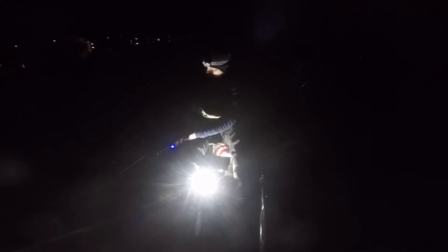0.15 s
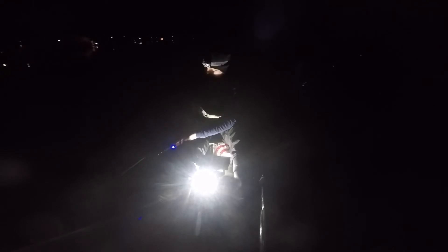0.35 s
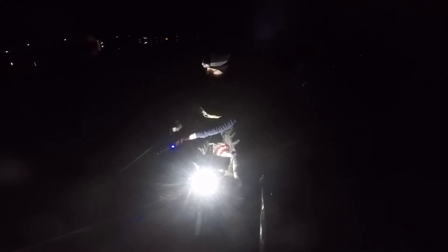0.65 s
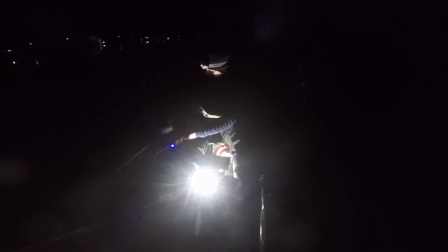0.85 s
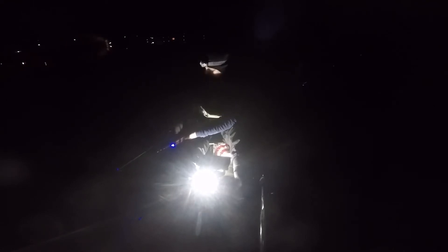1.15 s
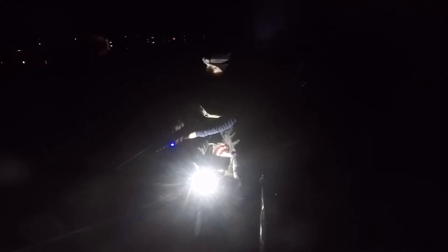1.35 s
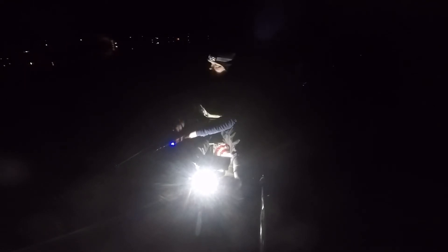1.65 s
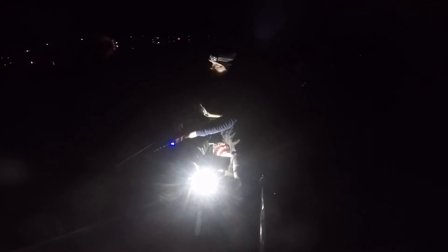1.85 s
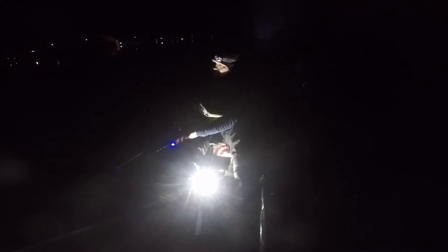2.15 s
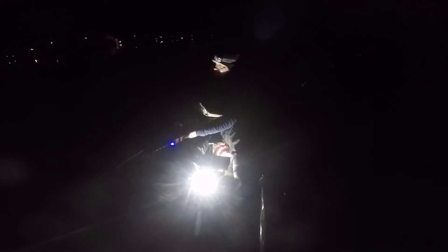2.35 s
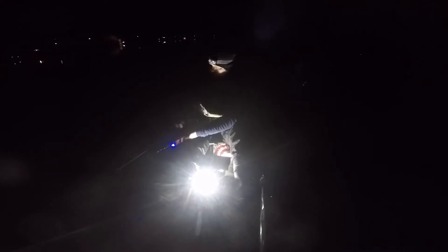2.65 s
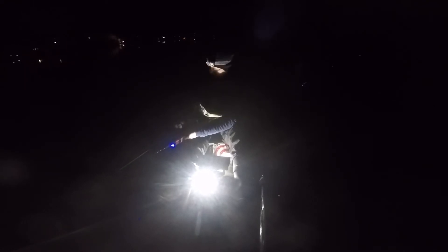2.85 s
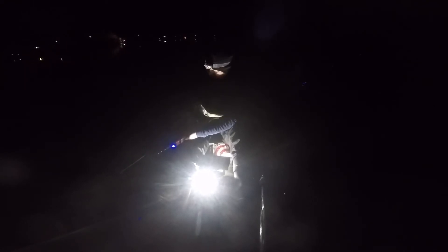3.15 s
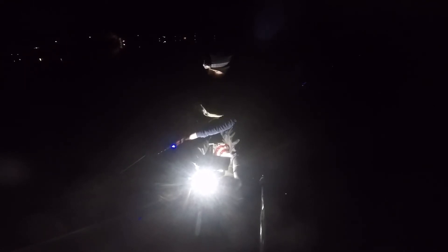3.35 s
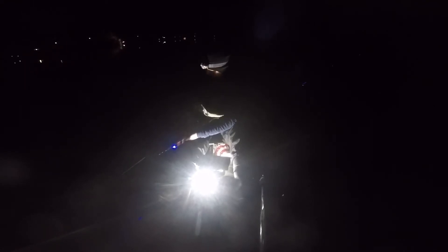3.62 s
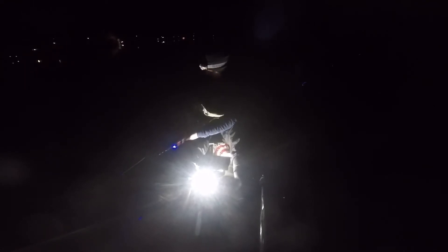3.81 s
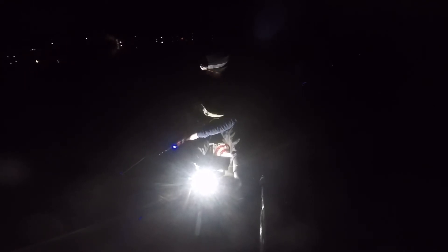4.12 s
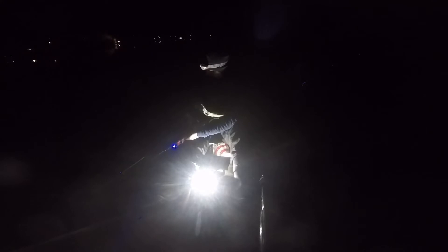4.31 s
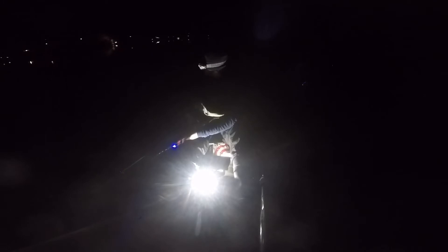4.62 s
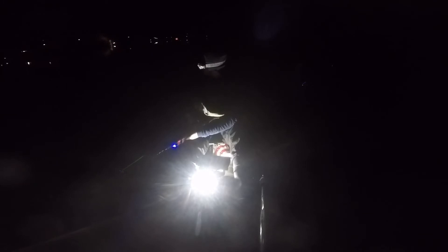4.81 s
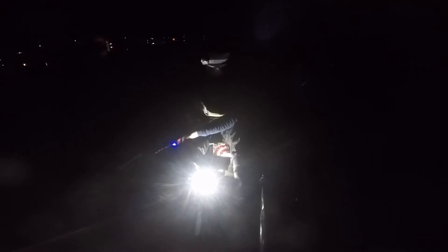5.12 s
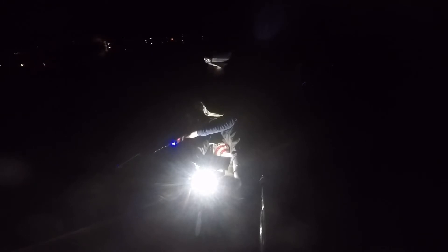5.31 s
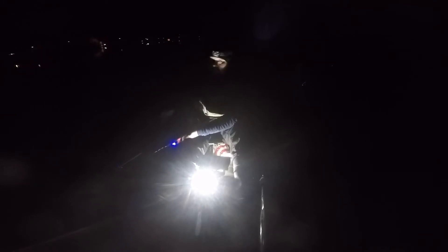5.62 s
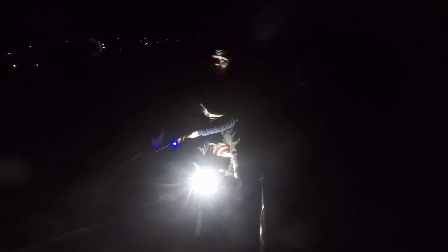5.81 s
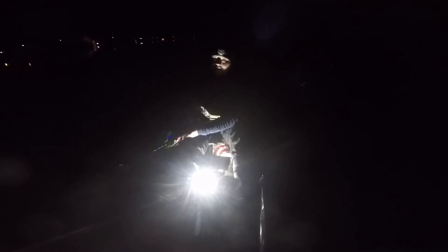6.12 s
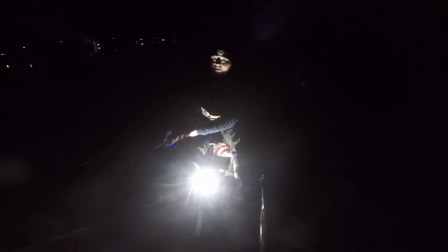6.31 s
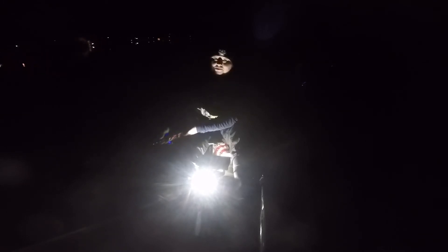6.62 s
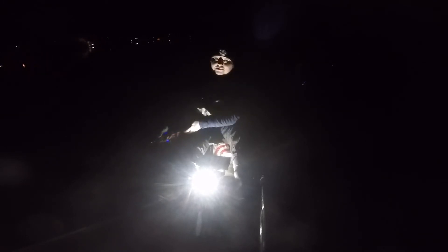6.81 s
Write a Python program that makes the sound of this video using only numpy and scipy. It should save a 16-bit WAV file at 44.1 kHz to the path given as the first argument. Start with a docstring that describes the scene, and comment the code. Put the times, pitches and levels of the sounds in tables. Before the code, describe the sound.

Low, fluttering motor drone across dark water, rising slightly before sliding away near five seconds, leaving rough rumble, soft water wash and hiss.

```python
"""A river at night: a distant motor hums and throbs, slowly gains speed, then winds down to a low idle.
The hum is a phase-integrated tone with weak partials; its rumble and the river's wash are coloured noise.
Weaker tones swell out of the rumble; a puff of wind dies away at the start, and a small gust follows.
Near the end come tiny ticks, a faint chirp and a soft double knock.
Electronics add hiss, a thin whine and a faint high buzz in regular bursts, mostly on the right."""
import sys
import numpy as np
from scipy import signal
from scipy.fft import rfft, irfft
from scipy.io import wavfile
from scipy.ndimage import uniform_filter1d

SR = 44100
rng = np.random.default_rng(int(sys.argv[2]) if len(sys.argv) > 2 else 0)


def transcribe(signal):
    """Save signal, clipped to [-1, 1], as a 16-bit WAV file at the path in sys.argv[1]."""
    frames = np.atleast_2d(signal).T
    limited = np.clip(frames, -1, 1)
    pcm = np.round(limited * 32767).astype(np.int16)
    wavfile.write(sys.argv[1], SR, pcm)


N = 307068
TIME = np.arange(N) / SR  # s
BINS_HZ = np.maximum(np.arange(N // 2 + 1) * SR / N, 1)

# How far sound reaches two microphone ports:
# (frequency [Hz], left minus right [dB], phase lead of left [rad], coherence [0-1])
PORT_RESPONSE = [(130, -1, -.18, .995), (220, -1.4, -.24, .975), (330, -3.2, -.42, .91),
                 (450, -6.8, -.68, .9), (540, -10, -1.0, .8), (620, -11.3, -1.9, .45),
                 (760, -7.7, -3.3, .72), (1000, -4.8, -3.8, .85), (1550, -4.4, -4.2, .78),
                 (1900, -4.5, -5.3, .68), (2350, -2.2, -5.4, .15), (2600, -2.2, -4.6, .55),
                 (3200, -3.3, -5.9, .82), (4200, -3.8, -6.8, .8), (5200, -1, -6.8, .15)]


def from_db(db):
    """Logarithmic level: 20 dB is a factor of ten in amplitude."""
    return 10 ** (np.asarray(db) / 20)


def in_time(rows):
    """Linear interpolation: each column of a curve at every sample."""
    s, *columns = np.transpose(rows)
    return [np.interp(TIME, s, column) for column in columns]


def over_hz(rows):
    """Logarithmic frequency scale: each column of a table at every frequency bin."""
    hz, *columns = np.transpose(rows)
    return [np.interp(np.log(BINS_HZ), np.log(hz), column) for column in columns]


def colour(spectrum):
    """Spectral shaping: gain per bin, falling 36 dB per octave beyond the end values."""
    lowest_hz, highest_hz = spectrum[0][0], spectrum[-1][0]
    inside = np.minimum(1, np.minimum(BINS_HZ / lowest_hz, highest_hz / BINS_HZ))
    return from_db(over_hz(spectrum)[0]) * inside ** 6


def drift(rate_hz):
    """Low-passed noise: a random fluctuation of unit spread, its spectrum halved at rate_hz."""
    slow = irfft(rfft(rng.standard_normal(N)) / (1 + (BINS_HZ / rate_hz) ** 2), N)
    return slow / slow.std()


def far_noise(spectrum):
    """Partial coherence: coloured noise shared by two ports; the mean of the ports has unit rms."""
    balance_db, lead, coherence = over_hz(PORT_RESPONSE)
    balance = from_db(balance_db)
    coherence = np.clip(coherence, 0, .999)
    right, independent = rfft(rng.standard_normal((2, N)))
    left = coherence * right + np.sqrt(1 - coherence ** 2) * independent
    left = left * balance * np.exp(1j * lead)
    # dividing by the expected size of the sum leaves the spectrum as that of the middle
    middle = np.sqrt(1 + balance ** 2 + 2 * coherence * balance * np.cos(lead))
    pair = irfft(np.array([left, right]) * colour(spectrum) / middle, N)
    return pair / pair.mean(axis=0).std()


def at_ports(sound):
    """Interaural-like differences: a far tone reaches two ports with unequal level and phase."""
    balance_db, lead, _ = over_hz(PORT_RESPONSE)
    left = from_db(balance_db) * np.exp(1j * lead)
    gains = np.array([left, np.ones_like(left)]) * 2 / (1 + abs(left))
    return irfft(rfft(sound) * gains, N)


def steadied(noise, share):
    """Envelope compression: part of the noise's slow surges in power is evened out."""
    span_s = .12
    power = uniform_filter1d(np.mean(noise ** 2, axis=0), max(int(span_s * SR), 1))
    return noise * (power / power.mean()) ** (-np.clip(share, 0, 1) / 2)


def motor_hum(pitch, gain_db, partials_db, waver_hz, flutter_db):
    """Phase is integrated frequency: a throbbing tone and weak partials follow the motor's speed."""
    # Hum over the water: (time [s], level before gain_db, flutter and throb [dB])
    hum_level = [(0, -28), (.2, -32.5), (.45, -27), (.75, -28.5), (1.0, -28), (1.45, -25.5), (1.67, -27),
                 (1.9, -25), (2.17, -30), (2.37, -24), (2.54, -32.5), (2.73, -24), (3.1, -25.5),
                 (3.4, -27.5), (3.63, -25), (3.85, -25), (4.2, -25.5), (4.4, -29), (4.8, -31), (5.15, -31),
                 (5.4, -35), (5.65, -39), (5.9, -42.5), (6.96, -47)]
    # Partials in step with the hum: (multiple of its pitch, relative level before partials_db [dB])
    partials = [(7 / 8, -23), (13 / 8, -21), (2, -26), (3, -26)]
    # Higher tone of the same motor, at 11/8 of the hum's pitch, free of throb: (time [s], level [dB])
    upper_level = [(0, -46), (.6, -45.5), (2, -45), (3.1, -39.5), (3.35, -47), (5.2, -45), (5.6, -58)]
    upper_ratio = 11 / 8

    phase = 2 * np.pi * np.cumsum(pitch + waver_hz * drift(10.4)) / SR
    tone = np.sin(phase)
    for multiple, db in partials:
        tone = tone + from_db(db + partials_db + 2.1 * drift(4.1)) * np.sin(multiple * phase)
    level_db = in_time(hum_level)[0] + gain_db + flutter_db * drift(21.3)
    hum = tone * throb(deepen=0.93, soften=0.99) * from_db(level_db)
    upper = from_db(in_time(upper_level)[0]) * np.sin(upper_ratio * phase)
    return np.sqrt(2) * at_ports(hum + upper)  # peak to rms


def throb(deepen, soften):
    """Amplitude modulation: brief Gaussian dips, uneven in spacing and depth."""
    # Dips: (centre [s], width before soften [s], depth before deepen [dB])
    dips = [(.195, .07, 2), (0.484, 0.033, 4.5), (0.729, 0.053, 5), (0.82, 0.022, 9.5), (1, 0.043, 10),
            (1.242, 0.038, 5), (1.687, 0.04, 8), (1.794, 0.036, 7), (2.216, 0.042, 11), (2.34, 0.058, 8.5),
            (2.467, 0.028, 3), (2.576, .05, 6), (2.8, 0.047, 10), (2.898, 0.025, 7), (3.01, 0.043, 8),
            (3.11, 0.028, 7), (3.22, 0.032, 7), (3.308, 0.039, 9), (3.38, 0.061, 6), (3.506, 0.046, 13),
            (3.79, .055, 6), (3.899, 0.035, 9), (4.013, 0.11, 7), (4.166, 0.032, 7), (4.293, 0.086, 5),
            (4.374, 0.03, 14), (4.573, .035, 9), (4.668, 0.042, 11), (4.765, 0.035, 7), (4.91, 0.13, 16),
            (5.025, .035, 10), (5.094, .035, 8), (5.266, 0.06, 12)]
    depth_db = sum(db * np.exp(-(2 * (TIME - s) / (soften * width)) ** 2) for s, width, db in dips)
    return from_db(-deepen * depth_db)


def motor_body(pitch, low_level, middle_level, even_share, ripple_db):
    """Band-shaped noise: the motor's rough rumble, its deepest band thinning as the pitch climbs."""
    # Spectra of the deepest, low and middle bands: (frequency [Hz], relative density [dB per Hz])
    deep_spectrum = [(113, -41), (121, -24), (127, -4.5), (136, 4.5), (146, 5), (162, -24)]
    low_spectrum = [(132, -31), (143, -11), (155, 2.5), (175, 0.5), (195, -1), (220, 0), (240, -3),
                    (260, -1.5), (290, -6.5), (340, -18.5), (420, -20)]
    middle_spectrum = [(270, -16.5), (330, -5.5), (365, -0.5), (420, -2), (480, 0), (520, 1), (560, -4.5),
                       (605, -8), (645, -14), (720, -16.5), (900, -30.5)]
    deep_db, thinning_db_per_hz = -44, 0.03  # level at the lowest pitch; loss above it

    deep_level = deep_db - thinning_db_per_hz * (pitch - pitch.min())
    deep = from_db(deep_level) * steadied(far_noise(deep_spectrum), even_share)
    low = from_db(low_level) * steadied(far_noise(low_spectrum), even_share)
    middle_gain = from_db(middle_level + ripple_db * drift(14))
    middle = middle_gain * steadied(far_noise(middle_spectrum), even_share)
    return deep + low + middle


def drones(waver_hz):
    """Gaussian envelopes: weaker tones swell and sink, sharing one random frequency waver."""
    # Tones: (centre [s], width [s], frequency [Hz], peak level [dB])
    swelling_tones = [(.25, .6, 292, -46), (.75, .1, 503, -41), (1.05, .1, 555, -41), (1.57, .09, 215, -36),
                      (1.72, .12, 483, -41.5), (3.59, .08, 603, -39.5), (5.27, .12, 258, -38),
                      (5.7, .14, 157, -37), (5.72, .25, 253, -41), (5.88, .14, 215, -39),
                      (6.07, .12, 220, -39), (6.18, .16, 252, -40), (6.35, .1, 160, -37)]
    wander = waver_hz * np.cumsum(drift(9.0)) / SR  # cycles
    sound = 0
    for s, width, hz, db in swelling_tones:
        swell = np.exp(-(2 * (TIME - s) / width) ** 2)
        sound = sound + from_db(db) * swell * np.sin(2 * np.pi * (hz * TIME + wander))
    return at_ports(sound)


def knocks():
    """Damped resonance: a soft, hollow, distant double knock rings briefly."""
    # Knocks: (time [s], level before the attack and decay [dB])
    knock_times = [(6.381, -29), (6.402, -28)]
    ring_hz, attack_s, decay_s = 522, .004, .014
    sound = 0
    for s, db in knock_times:
        age = np.maximum(TIME - s, 0)
        ring = (1 - np.exp(-age / attack_s)) * np.exp(-age / decay_s)
        sound = sound + from_db(db) * ring * np.sin(2 * np.pi * ring_hz * age)
    return at_ports(sound)


def chirp(waver_share):
    """Frequency modulation: a brief faint squeak and its thin overtone waver together in pitch."""
    # Components: (frequency before the waver [Hz], peak level [dB])
    components = [(1310, -42.5), (6700, -65)]
    centre_s, width_s = 6.205, 0.041
    swell = np.exp(-(2 * (TIME - centre_s) / width_s) ** 2)
    clock = TIME + waver_share * np.cumsum(drift(150)) / SR
    tones = sum(from_db(db) * np.sin(2 * np.pi * hz * clock) for hz, db in components)
    return at_ports(swell * tones)


def ticks():
    """Impulsive noise: tiny bright ticks close by start at once and decay exponentially."""
    # Ticks: (time [s], level at the onset [dB])
    tick_times = [(5.898, -56), (6.204, -60)]
    # Their spectrum: (frequency [Hz], relative density [dB per Hz])
    tick_spectrum = [(6300, -4), (9200, 0), (11500, -8)]
    decay_s = .002
    noise = irfft(rfft(rng.standard_normal((2, N))) * colour(tick_spectrum), N)
    envelope = sum(from_db(db) * (TIME >= s) * np.exp(-abs(TIME - s) / decay_s) for s, db in tick_times)
    return envelope * noise / noise.std()


def river_wash(wash_level, even_share, ripple_db):
    """Broadband flow noise: the river's soft hiss, rippling in level."""
    # Spectrum: (frequency [Hz], relative density [dB per Hz])
    wash_spectrum = [(550, -4), (750, 0), (900, 0.5), (1050, -1.5), (1400, -4), (1850, -4.5), (2150, -9),
                     (2450, -18), (2750, -15.5), (3100, -12.5), (3600, -11.5), (4100, -16.5), (4700, -28),
                     (6000, -36)]
    gain = from_db(wash_level + ripple_db * drift(26))
    return gain * steadied(far_noise(wash_spectrum), even_share)


def wind(own_db):
    """Turbulent pressure: air brushes the microphones and settles; small eddies differ at each port."""
    # Spectrum: (frequency [Hz], relative density [dB per Hz])
    wind_spectrum = [(12, -4), (25, 0), (42, 1), (55, 3), (64, 2), (80, -1.5), (105, 2), (140, -10),
                     (220, -33)]
    puff_db, puff_fall_db_per_s, calm_db = -43, 10, -71
    gust_s, gust_width_s, gust_db = 1.505, .06, -51  # one last small gust

    eddies = irfft(rfft(rng.standard_normal((2, N))) * colour(wind_spectrum), N)
    strength = np.hypot(from_db(puff_db - puff_fall_db_per_s * TIME), from_db(calm_db))
    strength = strength + from_db(gust_db) * np.exp(-(2 * (TIME - gust_s) / gust_width_s) ** 2)
    return strength * (far_noise(wind_spectrum) + from_db(own_db) * eddies / eddies.std())


def electronics(hiss_db, hiss_left_db, uneven_db):
    """Electrical noise: independent hiss per channel, a steady whine and periodic high bursts."""
    # Hiss spectrum: (frequency [Hz], relative density [dB per Hz])
    hiss_spectrum = [(100, 3), (2500, -0.5), (5000, -2), (7000, 0.5), (8100, -1), (9000, 0.5), (10000, -.5),
                     (11500, -7.5), (13000, -10), (14500, -21)]
    # One cycle of the buzz, two bursts in opposite phase: (time in cycle [s], relative amplitude)
    buzz_shape = [(.0048, 0), (.0075, .8), (.0102, 0.9), (.0118, 0), (.0128, -0.053), (.017, -0.89),
                  (.020, -0.96), (0.0216, 0)]
    # Thin steady whine: (frequency [Hz], level on the right [dB])
    whine_tones = [(7000, -79), (7048, -83), (9000, -81)]
    cycles_per_s, buzz_hz, buzz_db = 23.976, 8562, -54
    left_db = -39  # buzz and whine on the left, relative to the right

    hiss = irfft(rfft(rng.standard_normal((2, N))) * colour(hiss_spectrum), N)
    hiss = hiss / hiss.std() * from_db([[hiss_db + hiss_left_db], [hiss_db]])
    cycle = (TIME * cycles_per_s).astype(int)
    # each cycle draws its own starting phase and strength
    start, strength = rng.standard_normal((cycle[-1] + 1, 2))[cycle].T
    bursts = np.interp(TIME % (1 / cycles_per_s), *np.transpose(buzz_shape))
    carrier = np.sin(2 * np.pi * (buzz_hz * TIME + start))
    buzz = bursts * from_db(buzz_db + uneven_db * strength) * carrier
    whine = sum(from_db(db) * np.sin(2 * np.pi * hz * TIME) for hz, db in whine_tones)
    return hiss + (buzz + whine) * from_db([[left_db], [0]])


def scene():
    """Superposition: motor, passing small sounds, river, wind and electronics add linearly."""
    # The motor gains speed, then the throttle closes and it slides to idle: (time [s], hum pitch [Hz])
    motor_pitch = [(0, 145.6), (.6, 147.9), (1.2, 148.5), (2.7, 153.1), (3.7, 156.3), (4.35, 159.1),
                   (4.8, 162.4), (5.1, 166.3), (5.2, 161.4), (5.3, 148.7), (5.4, 141), (5.5, 132),
                   (5.7, 129.2), (6.0, 126.8), (6.96, 127)]
    # Noisy layers: (time [s], low rumble [dB], middle rumble [dB], river wash [dB]),
    # before the offsets below and the ripple
    body_level = [(0, -35.5, -42.5, -51.5), (.55, -36.5, -41, -51), (1.0, -37.5, -41, -51.5),
                  (1.45, -38, -42, -51.7), (1.62, -34.5, -39.5, -51), (1.85, -38, -41.5, -51.4),
                  (2.3, -36, -42, -51), (2.6, -36.5, -41, -52), (3.05, -36, -41.5, -51.5),
                  (3.45, -39.5, -44, -51.5), (4.2, -38.5, -43, -51.5), (4.8, -37.5, -43.5, -51.5),
                  (5.3, -37.5, -43, -50.5), (5.8, -36, -41, -51), (6.4, -38.5, -41.5, -50),
                  (6.96, -37.5, -45.5, -50.8)]
    even_share, ripple_db = 0.28, 0.9

    pitch, = in_time(motor_pitch)
    low_level, middle_level, wash_level = in_time(body_level)
    motor = motor_hum(pitch, gain_db=-1.5, partials_db=-1.0, waver_hz=0.2, flutter_db=0.57)
    motor = motor + motor_body(pitch, low_level + 0.5, middle_level - 0.1, even_share, ripple_db)
    small_sounds = drones(waver_hz=2.0) + knocks() + chirp(waver_share=.012) + ticks()
    surroundings = river_wash(wash_level, even_share, ripple_db) + wind(own_db=-18)
    noise = electronics(hiss_db=-59.0, hiss_left_db=-1.5, uneven_db=0.5)
    return motor + small_sounds + surroundings + noise


def record(dry):
    """Band limiting: an elliptic low-pass cuts the top steeply."""
    cutoff_hz, passband_ripple_db, stopband_db = 14700, .1, 80
    low_pass = signal.ellip(10, passband_ripple_db, stopband_db, cutoff_hz, fs=SR, output="sos")
    return signal.sosfilt(low_pass, dry)


dry = scene()
out = record(dry)
transcribe(out)
```